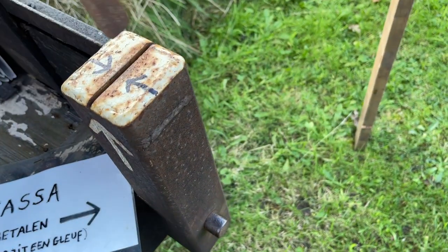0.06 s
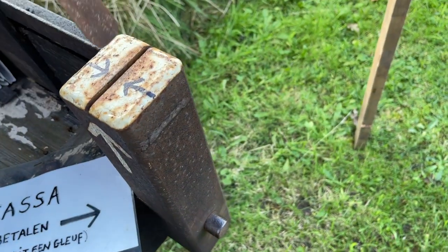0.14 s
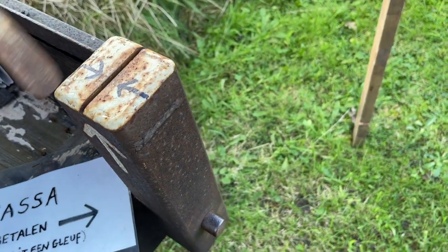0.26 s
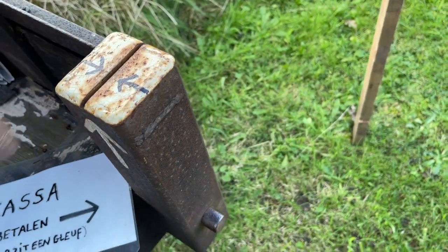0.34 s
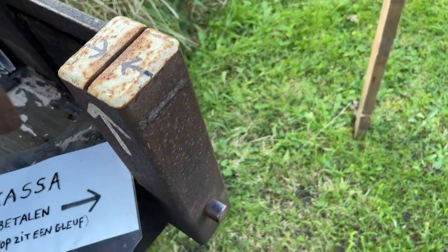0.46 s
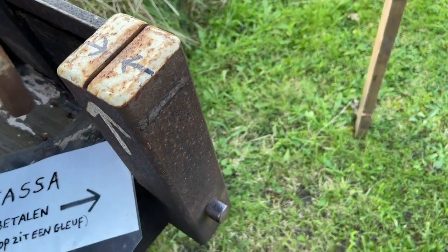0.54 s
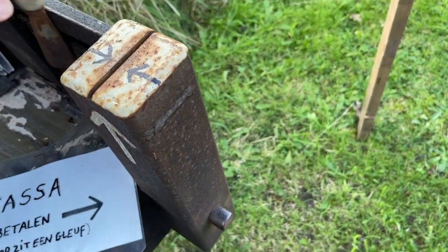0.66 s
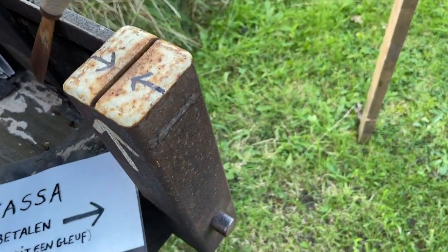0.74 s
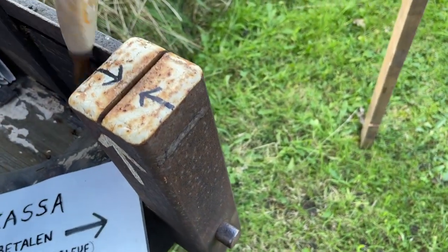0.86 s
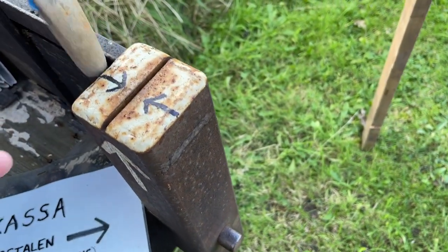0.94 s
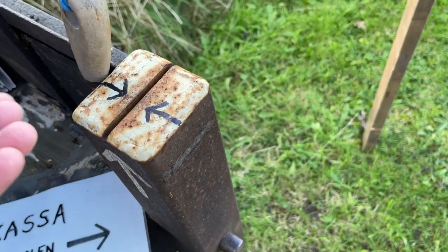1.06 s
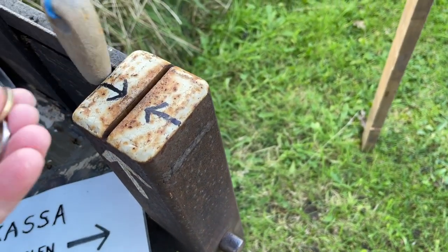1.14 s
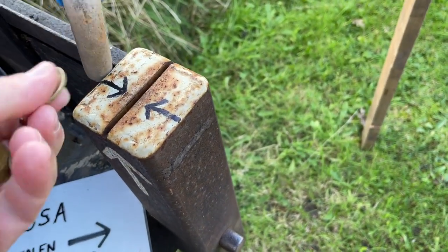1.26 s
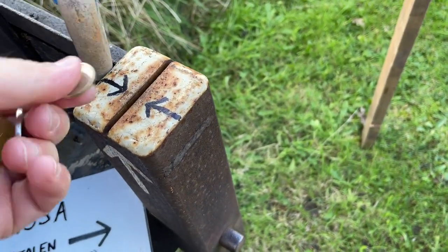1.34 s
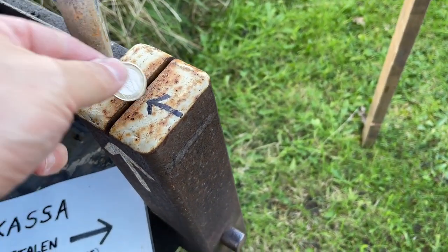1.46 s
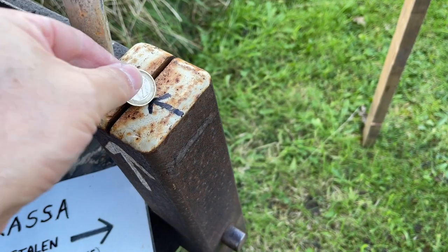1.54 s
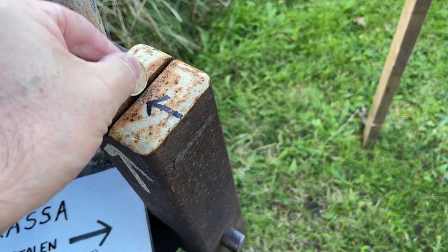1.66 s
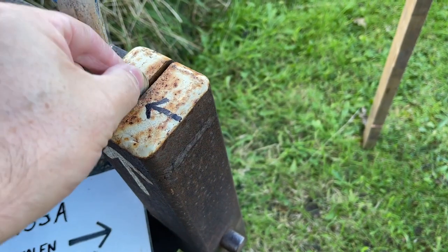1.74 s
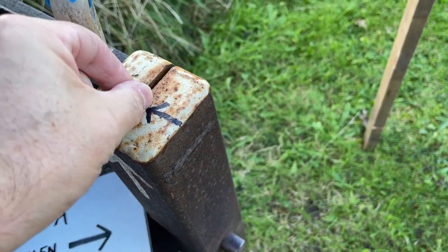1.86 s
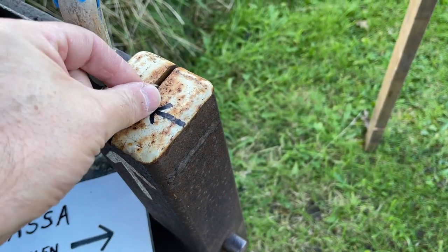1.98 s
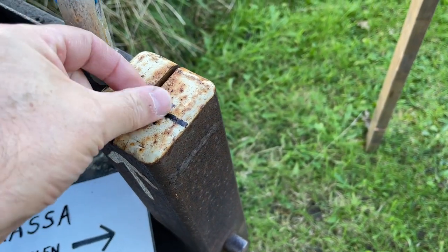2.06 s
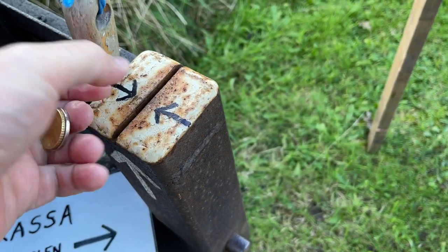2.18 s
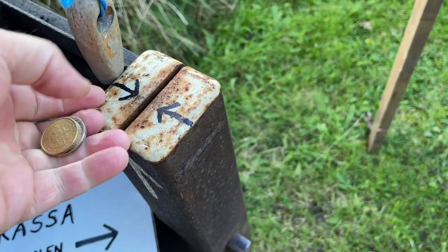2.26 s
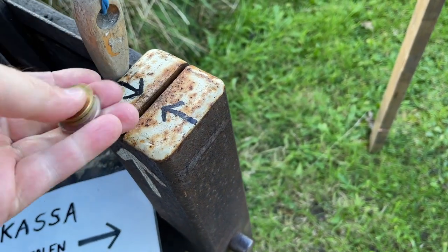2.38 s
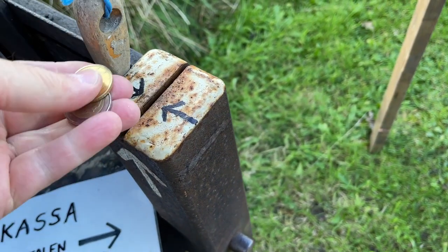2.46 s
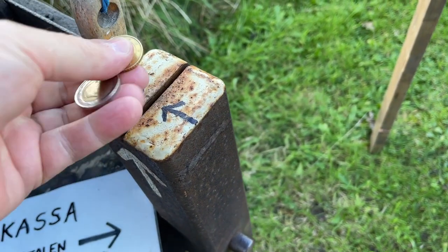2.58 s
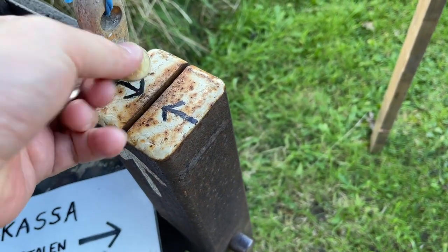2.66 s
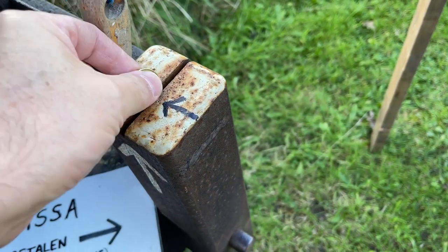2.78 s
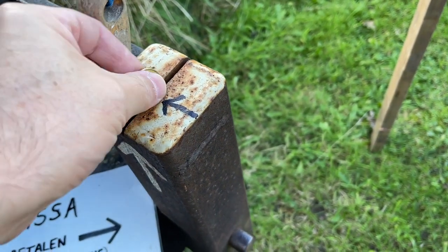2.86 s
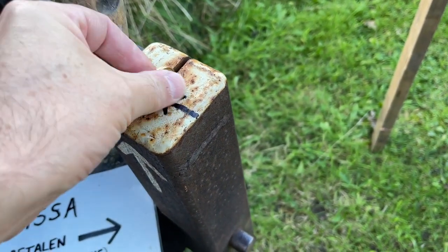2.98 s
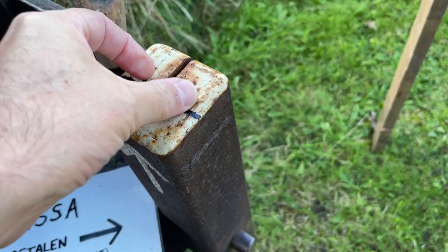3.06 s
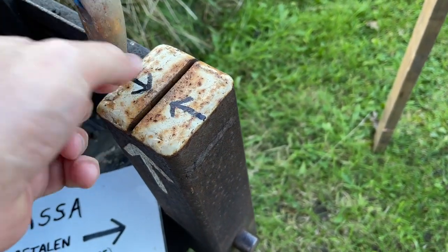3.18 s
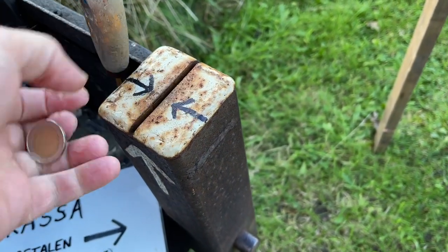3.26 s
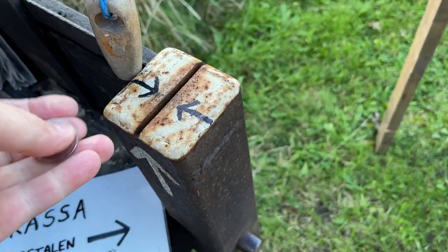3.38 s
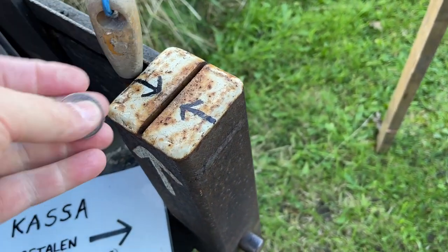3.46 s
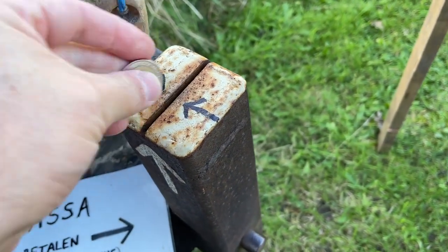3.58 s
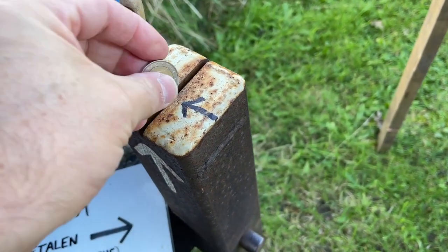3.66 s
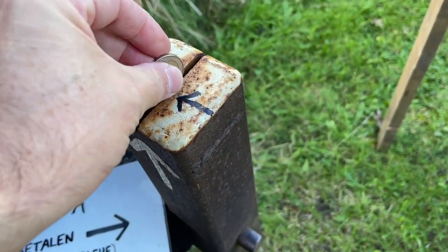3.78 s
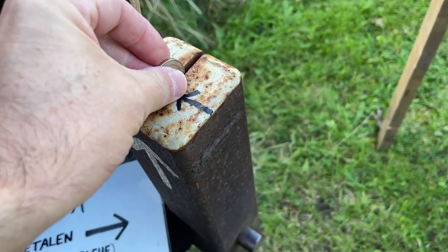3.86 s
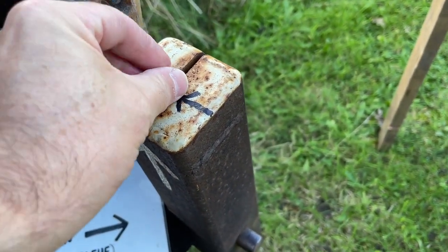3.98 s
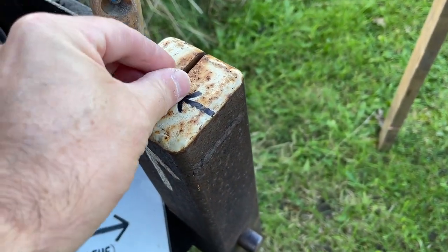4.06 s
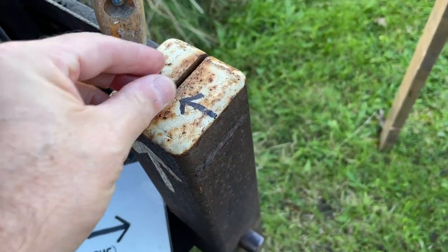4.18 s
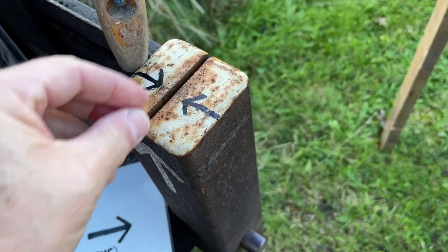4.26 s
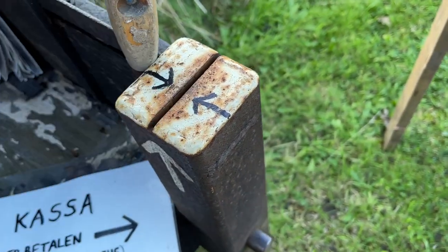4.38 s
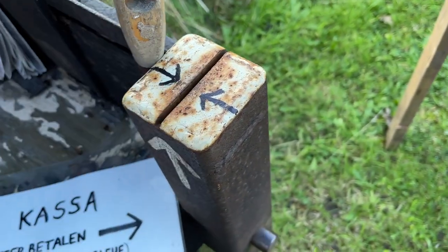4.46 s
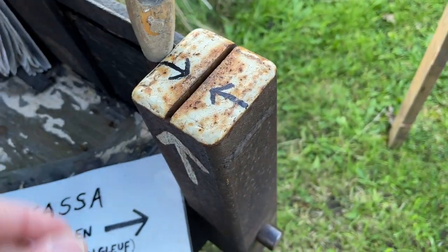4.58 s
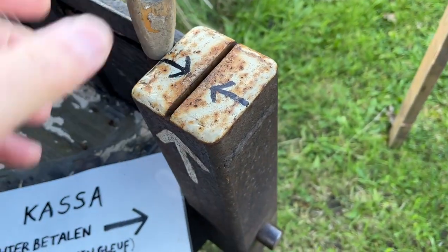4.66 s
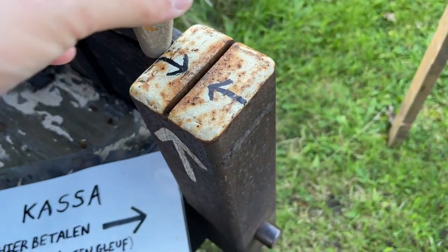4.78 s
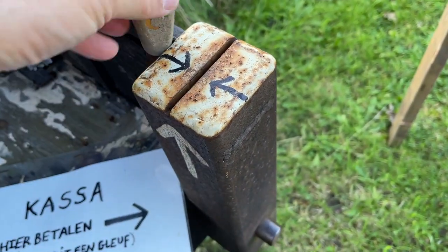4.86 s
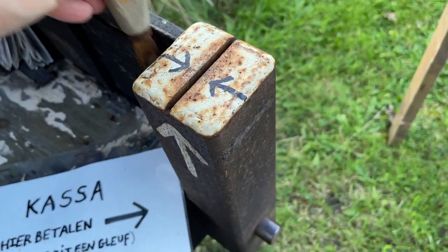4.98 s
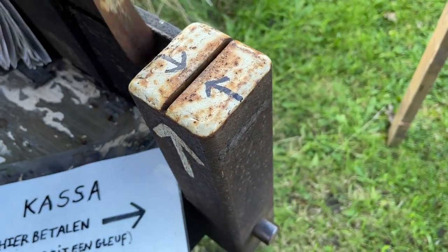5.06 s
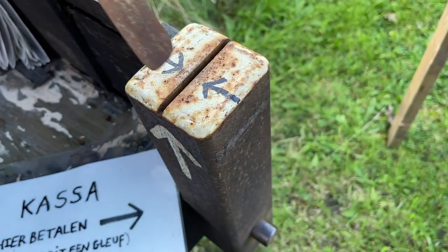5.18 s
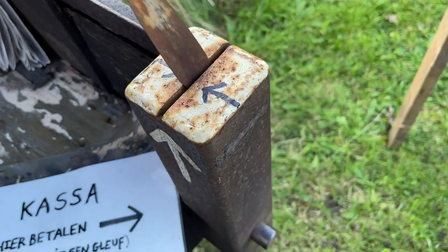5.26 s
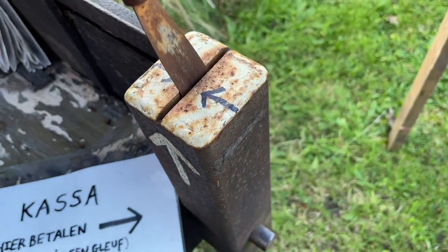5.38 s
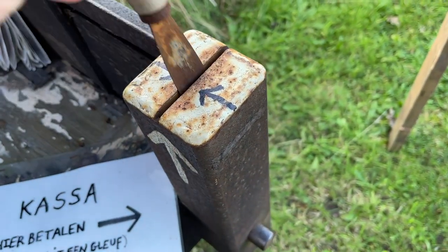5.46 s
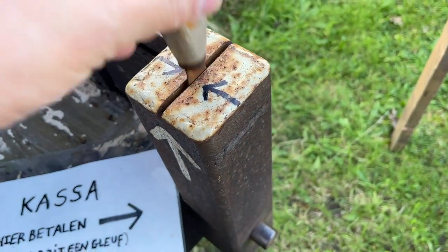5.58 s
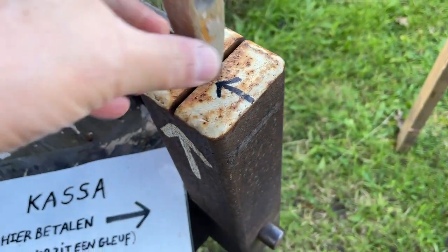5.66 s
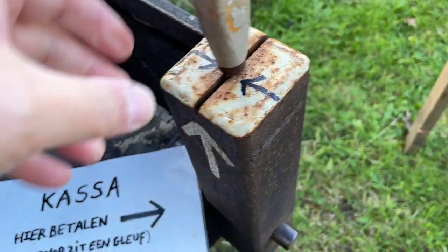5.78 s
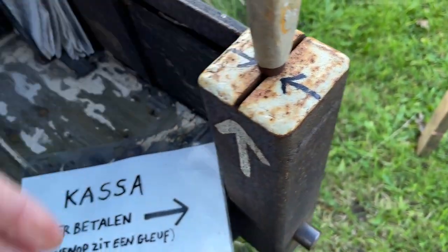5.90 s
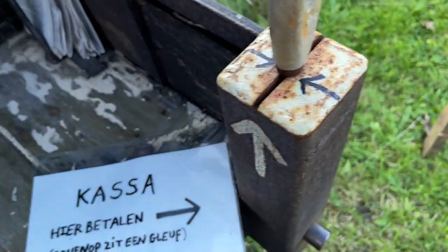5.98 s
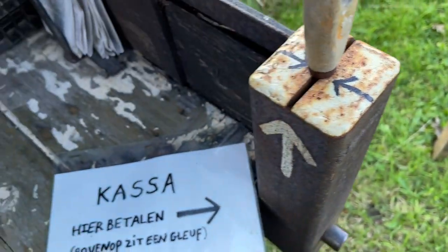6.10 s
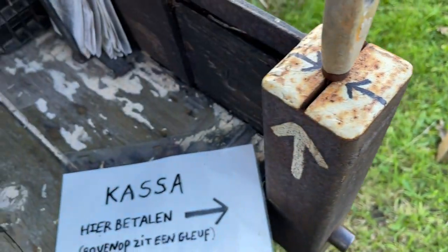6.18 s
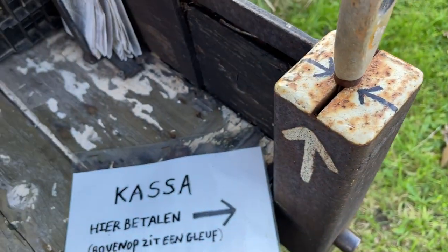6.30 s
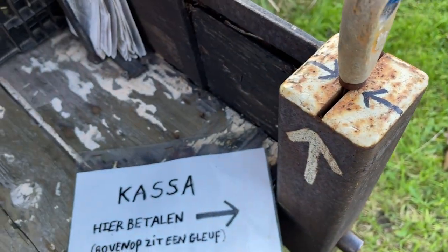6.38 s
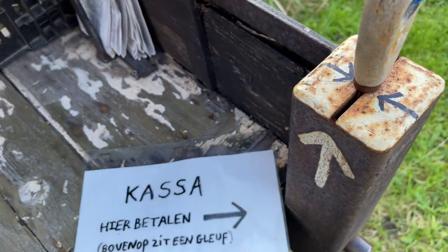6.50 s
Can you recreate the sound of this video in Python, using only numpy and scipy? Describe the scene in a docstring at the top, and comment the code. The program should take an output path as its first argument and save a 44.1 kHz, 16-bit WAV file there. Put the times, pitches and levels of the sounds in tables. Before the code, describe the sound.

Outdoors and close up, gusts of wind rumble and flutter on the microphone over a faint wash of distant traffic and rustling sleeve and grass. From about 0.7 to 1 second, a steel putty knife knocks and scrapes as it leaves the slot of a metal post. Coins then click and slide brightly in a hand. They scrape through the slot and clatter into the steel box at about 2.2 to 2.5 seconds, 3.1 to 3.4 and 4.2 to 4.6, with short metallic rings, some thin high ringing and more clicking between drops. At 4.9 seconds the blade knocks sharply on the post, then taps and scrapes. At 5.6 it drops into the slot and bounces faster and softer, ringing briefly and settling by about 6 seconds. One small click follows near 6.4. The wind eases around 4.3 seconds and returns at about 5.

```python
"""Coins into a steel pay post

A putty-knife blade is pulled from the slot of a post in a windy field. Coins click in a hand, scrape
through the slot and land inside; the blade drops back and bounces. Each contact is a noise crack plus
ringing steel modes; sliding is a run of tiny slips. Wind buffets the two microphone ports of a phone
close by, over far traffic and the rustle of sleeve and grass."""
import sys
import numpy as np
from scipy import signal
from scipy.fft import rfft, irfft, next_fast_len
from scipy.io import wavfile
from scipy.ndimage import map_coordinates

SR = 44100
rng = np.random.default_rng(int(sys.argv[2]) if len(sys.argv) > 2 else 0)


def unload_wav(signal):
    """Save mono or channel-first audio to the path in sys.argv[1] as 16-bit WAV at rate SR, clipped to [-1, 1]."""
    wavfile.write(
        sys.argv[1],
        SR,
        np.round(np.clip(np.atleast_2d(signal).T, -1, 1) * 32767).astype(np.int16),
    )


N = 288084

# held blade on the post: t/s, level/dB, favoured f/Hz, ring/dB, knock/dB, crack t60/s
BLADE_KNOCKS = [(0.6614, -8, 5110, -11.5, 0, 0.028), (0.6978, -26.5, 2550, 0.5, 13, 0.012),
                (0.718, -13, 2500, -7.5, 3.5, 0.023), (0.7534, -24.5, 2510, -12, 18, 0.14),
                (0.7804, -13.5, 10900, -8, 19, 0.03), (0.9013, -15, 10900, -20, -41, 0.033),
                (0.9337, -6, 4370, -11.5, -10.5, 0.031), (4.8908, 1, 8360, -9, -16.5, 0.023),
                (4.9453, -15.5, 11200, -15, -4, 0.031), (5.0196, -22, 2274, 2, -7, 0.036),
                (5.0493, -11, 2460, -14.5, -7, 0.02), (5.271, -4, 7230, -23, -14, 0.016),
                (5.305, -22, 2250, -12.5, -16, 0.038), (5.5136, -8, 8640, -13, -9, 0.039)]
# dropped blade, per landing: level/dB
LANDING_LEVELS_DB = [1, -2, -13.5, -14.5, -21.5, -28, -25, -39, -46, -52.5, -54]
# coins in the fingers: t/s, level/dB, favoured f/Hz, ring/dB
COIN_CLICKS = [(0.017, -28.5, 4200, -9), (0.037, -23, 10900, -28), (0.231, -25.5, 4700, -29),
               (0.267, -29, 6540, -19), (0.285, -35, 8500, -15), (0.54, -36.5, 9150, -16),
               (0.866, -36, 8500, -32), (0.909, -23, 7500, -6), (0.9594, -27, 4460, -11),
               (0.987, -7.5, 9250, -20), (1.002, -16.5, 11500, 0.5), (1.046, -20.5, 9400, -18),
               (1.059, -27, 8350, -6), (1.088, -9, 8800, -4), (1.1, -10, 8500, 3), (1.1078, -9.5, 9000, -1),
               (1.115, -28, 9000, -5), (1.19, -24, 5670, -19), (1.278, -12.5, 10700, -3.5),
               (1.3805, -9.5, 8700, -0.5), (1.3994, -12, 6760, -3.5), (1.516, -16.5, 7460, -31),
               (1.629, -14.5, 8340, -26), (1.692, -29, 7500, -28), (2.0367, -33.5, 6040, -6),
               (2.489, -4, 9000, -1), (2.554, -18, 8400, -10), (2.615, -16, 10500, 2),
               (2.6648, -10.5, 11300, -20), (2.706, -23, 5230, -27), (2.74, -15, 9150, -32),
               (2.781, -12.5, 7500, -25), (2.791, -5.5, 7700, -54), (2.802, -15, 9600, -15),
               (2.85, -16.5, 12000, -32), (2.989, -25, 9400, -21), (3.01, -10, 14200, -18),
               (3.088, -13, 14600, -23), (3.274, -13, 11400, -10), (3.441, -13, 8450, -1),
               (3.451, -13.5, 11700, 8), (3.5165, -12, 10700, 0), (3.587, -7.5, 13200, -28),
               (3.802, -21, 5160, -16), (3.823, -27, 4820, -19), (3.981, -27.5, 7750, -6),
               (4.519, -27, 11400, -22), (4.677, -29.5, 10200, 13), (5.133, -22.5, 6860, -6),
               (5.227, -26, 4160, -3.5), (5.412, -30.5, 7100, -1), (6.35, -12, 11600, -7.5)]
# one coin edge snapping past another: t/s, level/dB
COIN_TICKS = [(1.2735, -1), (1.468, -16), (1.513, -1), (1.578, -23), (1.5985, -12.5), (1.6246, 1.5),
              (1.6883, -8), (1.7108, -14), (2.5273, -5), (3.2707, -4)]
# coins on slot and box: t/s, level/dB, favoured f/Hz, knock/dB, crack t60/s
BOX_HITS = [(2.2257, -25, 2230, 14, 0.04), (2.2451, -2.5, 7760, -8, 0.02), (2.253, -6, 6800, -7, 0.036),
            (2.269, -3.5, 6300, -14, 0.028), (2.31, -15.5, 6370, -7, 0.037), (2.352, -15.5, 6000, -19, .04),
            (2.362, -7, 6300, -21, 0.02), (2.39, -29, 5000, -15, 0.024), (2.411, -25, 5260, -12, 0.035),
            (2.459, -24.5, 7260, -4.5, 0.12), (3.0264, -16, 5460, -16, 0.031),
            (3.151, -12, 6070, -19, 0.032), (3.1718, -2, 7700, -15, 0.049),
            (3.209, -1.5, 8900, -15.5, 0.028), (3.2185, -9.5, 9800, -16, 0.057),
            (3.3463, -9.5, 12060, -9.5, 0.028), (3.37, -4.5, 8450, -32, 0.047),
            (4.225, -37, 2100, -8, 0.025), (4.2427, -16.5, 8200, -0.5, 0.082),
            (4.261, -15.5, 1070, 9, 0.036), (4.273, -10.5, 7280, 2, 0.037), (4.359, -6, 7470, -14.5, 0.04),
            (4.3912, -17, 6250, -4, 0.037), (4.409, -30.5, 2670, 2.5, 0.063),
            (4.4496, -30.5, 6400, 6.5, 0.076), (4.505, -36, 2650, 7, 0.056), (4.5637, -22, 6270, -9, 0.047),
            (4.6257, -19.5, 5880, 6.5, 0.038)]
# modes of blade, coin and box: f/Hz, relative level/dB, nominal t60/s
BLADE_RESONANCES = [(636, -6.5, 0.085), (765, -8.5, 0.18), (852, -15.5, 0.19), (1036, -9.5, 0.11),
                    (1251, -12.5, 0.13), (1650, -15, 0.11), (1975, -12.5, 0.26), (2284, -4.5, 0.075),
                    (2500, -16, 0.24), (2920, -18, 0.14), (3526, -11, 0.19), (4370, -14, 0.14),
                    (5365, -6.5, 0.1), (5550, -9.5, 0.14), (6910, 0, .05), (7660, -2.5, 0.062),
                    (7350, -8, 0.047), (8770, -4.5, 0.053), (11280, -4, 0.061)]
COIN_RESONANCES = [(6110, 9.9, 0.03), (7820, 9.3, 0.035), (8770, 15.4, 0.024), (10900, 3.6, 0.098),
                   (11104, 23.2, 0.027), (12800, 4.2, 0.045)]
BOX_RESONANCES = [(190, -10, 0.052), (577, 3, 0.049), (613, -3, 0.097), (749, -10, 0.11),
                  (1085, -6.5, 0.081), (1360, -14, 0.085), (1660, -17, 0.13), (2255, -13.5, 0.14),
                  (2673, -11, 0.064), (3411, -3, 0.06), (4400, -11, 0.046), (5430, -16, 0.11),
                  (5700, -1, 0.086), (6085, 3.5, 0.039), (6700, -7, 0.079), (7070, -0.5, 0.053),
                  (7486, -8, 0.1), (8550, -8.5, 0.13), (8770, -6, 0.11), (9150, -4.5, 0.074),
                  (11150, -6, 0.1), (12220, -3.5, 0.042), (12500, -20, 0.047)]
# long rings of blade and post: t/s, length/s, f/Hz, level/dB, fade/(dB/s)
LONG_RINGS = [(0.661, 0.029, 8661, -23, 300), (0.664, 0.085, 3481, -31.5, 200),
              (0.721, 0.043, 2521, -33, 100), (0.723, 0.039, 1271, -23, 100), (0.933, 0.12, 2495, -31, 133),
              (0.934, .16, 4361, -31, 149), (1.516, 0.038, 5610, -34, 250), (2.495, 0.052, 625, -33, 100),
              (3.185, 0.1, 596, -36.5, 47), (3.198, 0.053, 1648, -32.5, 60), (3.353, 0.067, 1651, -39, 40),
              (3.439, 0.16, 774, -42, 67), (4.246, 0.085, 590, -28, 123), (4.255, 0.075, 1668, -37, 120),
              (4.259, 0.06, 201, -29, 60), (4.36, 0.27, 1091, -52, 32), (4.362, 0.22, 585, -41, 53),
              (4.495, 0.13, 1659, -54, 13), (4.629, 0.12, 785, -39.5, 64), (4.637, 0.062, 1371, -45, 100),
              (5.534, 0.087, 5337, -43, 5), (5.596, 0.45, 3466, -38, 43), (5.605, 0.4, 1943, -35, 18),
              (5.684, 0.38, 2257, -50, 38), (5.69, .31, 768, -42, 25)]
# loose coin singing: t/s, length/s, index into COIN_EDGE_HZ, level/dB
COIN_SINGS = [(2.246, 0.027, 2, -7), (2.28, .17, 2, -14), (2.615, 0.064, 2, -17), (3.009, 0.17, 1, -23),
              (3.198, 0.3, 1, -20), (3.35, 0.21, 1, -7), (3.43, 0.2, 2, -21), (4.642, 0.14, 1, -23)]
# slides of blade, coins and fingers: t/s, length/s, hiss/dB, rasp/dB, rasp f/Hz
SLIDES = [(0.211, 0.13, -54, -52, 2980), (0.336, 0.096, -50.5, -55, 6500), (0.671, 0.07, -63, -36, 2200),
          (0.7, 0.052, -46, -31.5, 1260), (0.78, 0.024, -19.5, -35, 2190), (0.795, 0.04, -43, -38.5, 2400),
          (0.947, 0.053, -28, -65, 5500), (1.064, 0.09, -24.5, -41, 5930), (1.117, 0.11, -39, -34.5, 5630),
          (2.239, 0.074, -31.5, -39, 6000), (2.345, 0.093, -39, -40.5, 5230), (2.484, 0.06, -30, -34, 6700),
          (2.562, 0.13, -39, -50, 4550), (2.686, 0.1, -44.5, -42.5, 2310), (3.193, 0.042, -40, -27, 6040),
          (3.367, 0.031, -18.5, -30, 6040), (3.443, 0.18, -34, -51, 4200), (4.238, 0.05, -42, -44, 3830),
          (4.623, .13, -27.5, -69, 6000), (5.03, 0.018, -31, -39, 3500), (5.09, 0.086, -44.5, -42.5, 3180),
          (5.205, 0.05, -46, -46.5, 3900), (5.533, 0.081, -37.5, -48, 5600),
          (6.367, 0.039, -48, -42.5, 3180)]
# spectra of contact crack and sliding hiss: f/Hz, level/dB
CRACK_EQ = [(150, -22), (500, 7), (1500, 3.5), (3000, -2.5), (6000, -2), (9000, 1.5), (12000, -1),
            (14000, -8.5), (16500, 10)]
SLIDE_EQ = [(5000, -18.5), (7300, -4.5), (8600, 3.5), (10200, 9.5), (11700, 7), (13000, -9), (16000, -12)]
# gusts on the ports: t/s, hold/s, rumble/dB, flutter offset/dB
WIND_GUSTS = [(0.02, 0.062, -24, -3), (0.118, 0.034, -26.5, 4.5), (0.207, 0.014, -30, -6),
              (0.282, 0.008, -29, 1.5), (0.407, 0.032, -25.5, 3.5), (0.443, 0.098, -23, 2),
              (0.72, 0.02, -26.5, -4.5), (0.776, 0.13, -23, -2), (0.987, 0.011, -31, -9),
              (1.102, 0.013, -26.5, 4.5), (1.197, 0.01, -28, -8.5), (1.513, 0.14, -30, -4.5),
              (1.774, 0.29, -28.5, -2.5), (2.342, 0.013, -33.5, -3.5), (2.577, 0.15, -28, -1.5),
              (2.808, 0.091, -27.5, -14.5), (3.139, 0.033, -32, -9.5), (3.454, 0.013, -29.5, -9),
              (3.669, 0.022, -28, -7.5), (3.968, 0.0095, -26, -5), (4.709, 0.011, -29.5, 3.5),
              (4.935, 0.0066, -15.5, -1.5), (4.996, 0.027, -24, 4.5), (5.059, 0.25, -25.5, -1.7),
              (5.37, 0.064, -31, -8.5), (5.758, 0.0088, -30.5, -22), (5.996, 0.017, -18.5, -4),
              (6.068, 0.065, -30.5, -3.5), (6.19, 0.19, -32.5, -8.5), (6.391, 0.018, -18.5, 0.5),
              (6.498, 0.078, -19.5, -9.5)]
# rumble between gusts: t/s, level/dB
BREEZE_LEVELS = [(0, -37), (1.0, -39), (1.4, -45.5), (2.2, -44), (3.0, -41.5), (4.0, -40), (4.3, -57),
                 (4.6, -51), (5.0, -42.5), (6.53, -41)]
# eddies striking the ports: t/s, relative level/dB
EDDIES = [(0.444, -8.5), (0.516, -3.5), (0.78, -6), (0.863, -13), (1.095, -4.5), (1.136, -13.5),
          (1.503, -17.5), (1.568, -23), (1.589, -22.5), (1.9, -15), (2.587, -5), (2.708, -16), (3.96, -31),
          (4.912, -5.5), (4.938, -10), (5.102, -8), (5.223, -9.5), (6.005, -11), (6.407, -21)]
# turbulence spectra, low to high: f/Hz, level/dB
RUMBLE_EQ = [(15, -62), (30, -28), (45, 3), (70, 7.5), (120, 2), (200, -8.5), (400, -57)]
FLUTTER_EQ = [(80, -11), (150, 1.5), (250, 2), (350, -4.5), (600, -83)]
CRACKLE_EQ = [(200, -16.5), (380, 2), (600, -5.5), (900, -18), (1500, -28.5), (3000, -52.5)]
# spectrum of far traffic and grass: f/Hz, level/dB
FIELD_EQ = [(100, -13), (300, -13.5), (727, -18), (1440, -22), (1900, -27), (2620, -27), (4270, -44.5),
            (8830, -44.5), (10300, -38), (11700, -43), (12300, -79), (12800, -94)]
# left-right likeness of the background: f/Hz, coherence
FIELD_COHERENCE = [(300, 0.48), (2000, 0.078), (6000, 0.45), (10000, 1)]
# sleeve and grass, relative levels: t/s, low band/dB, high band/dB
RUSTLE_LEVELS = [(0, -69, -53), (.1, -70, -62), (.3, -52, -61), (.6, -59, -58.5), (1.8, -54.5, -53),
                 (2.3, -49.5, -56), (3.5, -47, -44.5), (4.1, -62, -56), (5.3, -50.5, -48.5),
                 (6.53, -53, -51.5)]
# rustle spectra: f/Hz, level/dB
LOW_RUSTLE_EQ = [(600, -8), (1200, 0), (2600, -0.5), (4000, -20)]
HIGH_RUSTLE_EQ = [(2000, -10), (3500, 3), (8500, 1), (10300, 1), (11700, 2.5), (12300, -42), (12800, -60)]
# phase between the ports: f/Hz, left lead/rad
PORT_PHASE = [(0, 0), (500, .4), (1100, 1.1), (2000, 1.7), (2800, .9), (4200, .4), (5800, .6), (7300, 1),
              (8700, -.4), (10250, -3.2), (11700, -5.4), (12500, -6.8), (13100, -8.6), (14300, -9.8),
              (15500, -10)]
# treble cut above 12 kHz that dulls the whole sound: f/Hz, gain/dB
TREBLE_CUT_EQ = [(12300, 2), (13500, -10), (16000, -24)]

COIN_EDGE_HZ = (11100, 13120, 14210)
SIDES = np.array([[1], [-1]])  # left, right


def amp(db):
    """dB to gain."""
    return 10 ** (np.asarray(db) / 20)


def along(points, hz):
    """Interpolate (f/Hz, value) points on a log axis."""
    f, v = np.transpose(points)
    return np.interp(np.log(hz + 1), np.log(f + 1), v)


def curves(rows):
    """Per-sample curve of each column after t/s."""
    times, *columns = np.transpose(rows)
    return [np.interp(np.arange(N) / SR, times, column) for column in columns]


def wobble(rate_hz):
    """Smooth random curve, rate_hz knots a second."""
    knots = rng.standard_normal(int(N * rate_hz / SR) + 4)
    return map_coordinates(knots, [np.arange(N) * rate_hz / SR])


def filtered(x, response):
    """Apply a complex frequency response."""
    m = next_fast_len(x.shape[-1] + 2048)
    return irfft(rfft(x, m) * response(np.fft.rfftfreq(m, 1 / SR)), m)[..., :x.shape[-1]]


def stereo(noises, eq, coherence):
    """Two noises to stereo, rms 1. eq/dB: table or function; coherence: table or number."""
    def response(f):
        alike = np.full_like(f, coherence) if np.isscalar(coherence) else along(coherence, f)
        angle = np.arccos(np.clip(alike, -1, 1)) / 2
        return amp(eq(f) if callable(eq) else along(eq, f)) * [np.cos(angle), np.sin(angle)]
    mid, side = filtered(noises, response)
    both = np.array([mid + side, mid - side])
    return both / np.sqrt(np.mean(both ** 2) + 1e-20)


def strike(hits, modes, sustain, favour_db, width_oct, scatter_db, detune, coherence, knock_hz, snap,
           clatter_db):
    """Each hit cracks and rings the modes, most near the pitch its spot favours. Rows as BLADE_KNOCKS."""
    out, t = np.zeros((2, N + SR)), np.arange(SR // 3) / SR
    n = SR // 8
    crack_t = t[:n]
    mode_hz, mode_db, t60_s = np.transpose(modes)[:, :, None]
    for start_s, db, spot_hz, ring_db, knock_db, crack_s in hits:
        def spot_db(f):
            favoured = favour_db * np.exp(-(np.log2((f + 1) / spot_hz) / width_oct) ** 2)
            return favoured + knock_db / (1 + (f / knock_hz) ** 6)
        scatter, mistune, split, skew = rng.standard_normal((4, len(modes), 1))
        gain = amp(mode_db + spot_db(mode_hz) + scatter_db * scatter)
        hz = mode_hz * (1 + detune * mistune)
        beat = 1 + 0.71 * np.cos(2 * np.pi * (0.009 * hz * split * t + mistune))  # rust splits the modes
        decay = amp(-60 * t / (t60_s * sustain * crack_s / 0.032))  # a firm grip shortens crack and ring
        envelope = gain * beat * decay
        phase = 2 * np.pi * hz * t
        ring = np.array([np.sum(envelope * np.sin(phase + 0.41 * k * skew), axis=0) for k in (1, -1)])
        ring *= amp(ring_db) / np.linalg.norm(gain) * (1 - np.exp(-t / 0.00015))
        hiss = stereo(rng.standard_normal((2, n)), lambda f: along(CRACK_EQ, f) + spot_db(f), coherence)
        blows = rng.standard_normal(n) ** 3 * amp(-60 * crack_t / (1.56 * crack_s))  # many tiny blows
        blows[0] = 1.17 * np.linalg.norm(blows)  # the first is hardest
        hit = signal.fftconvolve(ring, blows[None] / np.linalg.norm(blows), axes=1)[:, :len(t)]
        clatter = amp(clatter_db - 60 * crack_t / (4.54 * crack_s))  # countless weak modes die later
        crack = amp(-60 * crack_t / crack_s) + clatter + snap * np.exp(-crack_t / 0.00043)
        hit[:, :n] += 0.5 * hiss * crack * (1 - np.exp(-crack_t / 0.00065))
        out[:, round(start_s * SR):][:, :len(t)] += amp(db) * hit
    return out[:, :N]


def held_blade():
    """The gripped blade knocks on the post."""
    return strike(BLADE_KNOCKS, BLADE_RESONANCES, sustain=0.89, favour_db=16.5, width_oct=0.071,
                  scatter_db=2.5, detune=0.0024, coherence=0.48, knock_hz=2000, snap=0.42, clatter_db=-24)


def dropped_blade(drop_s=5.5977, flight_s=0.0835, shrink=0.795, rock_s=0.038, crack_s=0.021):
    """The blade bounces ever faster on the slot, rocking once after each of the first three landings."""
    land_hz, rock_hz = 2200, (5340, 6850, 6850)
    land_s = drop_s + flight_s * (1 - shrink ** np.arange(len(LANDING_LEVELS_DB))) / (1 - shrink)
    # weak landings: more ring and knock than crack
    landings = [(land_s[i], db, land_hz, -14.5 + 2.71 * i, 4 * i, crack_s)
                for i, db in enumerate(LANDING_LEVELS_DB)]
    rocks = [(land_s[i] + rock_s, -21 - 8 * i, hz, 3.5, -9, crack_s) for i, hz in enumerate(rock_hz)]
    return strike(landings + rocks, BLADE_RESONANCES, sustain=1.2, favour_db=9.5, width_oct=0.045,
                  scatter_db=2, detune=0.0023, coherence=0.91, knock_hz=3050, snap=1.6, clatter_db=-16)


def coins_in_hand(knock_db=-6, tick_hz=7600, tick_ring_db=-21, tick_s=0.0071):
    """Coins click and tick, too small to knock; freely ringing clicks last longer."""
    clicks = [(start_s, db, hz, ring_db, knock_db, 0.037 * np.exp(0.014 * ring_db))
              for start_s, db, hz, ring_db in COIN_CLICKS]
    ticks = [(start_s, db, tick_hz, tick_ring_db, knock_db, tick_s) for start_s, db in COIN_TICKS]
    return strike(clicks + ticks, COIN_RESONANCES, sustain=0.76, favour_db=10.5, width_oct=0.73,
                  scatter_db=4.5, detune=0.029, coherence=0.82, knock_hz=2340, snap=0.51, clatter_db=-24)


def coins_in_box(ring_db=-6.5):
    """Coins hit the slot and land inside, ringing the steel box."""
    hits = [(start_s, db, hz, ring_db, *rest) for start_s, db, hz, *rest in BOX_HITS]
    return strike(hits, BOX_RESONANCES, sustain=0.88, favour_db=13.5, width_oct=0.047,
                  scatter_db=4, detune=0.0042, coherence=0.63, knock_hz=2340, snap=0.39, clatter_db=-15)


def lingering_modes(waver_db=3.5, waver_hz=22):
    """Single modes of blade and post ring on, fed by a rolling coin or dragging edge."""
    out = np.zeros((2, N))
    for start_s, length_s, hz, db, fade_db_per_s in LONG_RINGS:
        t = np.arange(int(length_s * SR)) / SR
        gate = np.clip(np.minimum(t / 0.0024, (t[-1] - t) / 0.039), 0, 1)
        knots = rng.standard_normal((3, 40))
        depth = min(1, 1000 / hz) ** 0.49  # steadier above 1 kHz
        swell, drift = (depth * map_coordinates(k, [t * 70]) for k in knots[:2])
        phase = 2 * np.pi * np.cumsum(hz + waver_hz * drift) / SR + 0.15 * knots[2, 0] * SIDES
        envelope = amp(db - fade_db_per_s * t + waver_db * swell) * gate
        out[:, round(start_s * SR):][:, :len(t)] += envelope * np.sin(phase)
    return out


def singing_coins(waver_hz=60, fade_db_per_s=116):
    """A loose coin sings on an edge mode until caught, wavering as it turns."""
    out = np.zeros((2, N))
    waver_rad = 2 * np.pi * waver_hz * np.cumsum(wobble(280)) / SR
    for start_s, length_s, mode, db in COIN_SINGS:
        t = np.arange(int(length_s * SR)) / SR
        gate = np.clip(np.minimum(t / 0.0027, (t[-1] - t) / 0.014), 0, 1)
        span = slice(round(start_s * SR), round(start_s * SR) + len(t))
        tone = np.sin(2 * np.pi * COIN_EDGE_HZ[mode] * t + waver_rad[span])
        out[:, span] += amp(db - fade_db_per_s * t) * gate * tone
    return out * amp(4.4 * wobble(70) + 1.7 * np.array([wobble(78), wobble(70)]))


def sliding():
    """Tiny uneven slips: a high hiss and a rasp around one pitch."""
    out = np.zeros((2, N))
    grit = amp(4 * wobble(450) + 2.2 * wobble(80))
    for start_s, length_s, hiss_db, rasp_db, rasp_hz in SLIDES:
        n = int(length_s * SR)
        span = slice(round(start_s * SR), round(start_s * SR) + n)
        slips = grit[span] * rng.standard_normal((4, SR // 4))[:, :n]
        hiss = stereo(slips[:2], SLIDE_EQ, 0.97)
        rasp = stereo(slips[2:], lambda f: -23 * np.abs(np.log2((f + 1) / rasp_hz)), 0.55)
        arch = np.sin(np.linspace(0, np.pi, n)) ** 0.5
        out[:, span] += arch * (amp(hiss_db) * hiss + amp(rasp_db) * rasp)
    return out


def gust_levels(rise_db_per_s=363, fall_db_per_s=252):
    """Rumble and flutter in dB: gusts rise, hold and fall back to the breeze; flutter moves faster."""
    start_s, hold_s, db, offset_db = np.transpose(WIND_GUSTS)[:, :, None]
    t = np.arange(N) / SR
    breeze_db, = curves(BREEZE_LEVELS)
    drop_db = rise_db_per_s * np.maximum(start_s - t, 0)
    drop_db += fall_db_per_s * np.maximum(t - start_s - hold_s, 0)
    rumble_db = np.maximum(breeze_db, np.max(db - drop_db, axis=0))
    flutter_db = np.maximum(breeze_db - 10.5, np.max(db + offset_db - 1.69 * drop_db, axis=0))
    return rumble_db, flutter_db - 1


def eddy_pops(typical_hz=490, rise_cycles=0.65):
    """An eddy strikes the ports: a short pop, falling in pitch."""
    out, t = np.zeros((2, N + SR)), np.arange(SR // 20) / SR
    for start_s, db in EDDIES:
        offset, skew, spread = rng.standard_normal(3)
        hz = typical_hz * np.exp(0.15 * spread)
        age = hz * t / rise_cycles
        swing = np.sin(2 * np.pi * (hz * t / (1 + 18 * t) + offset) + 0.37 * skew * SIDES)
        out[:, round(start_s * SR):][:, :len(t)] += amp(db - 3) * (age * np.exp(1 - age)) ** 2 * swing
    return out[:, :N]


def wind():
    """Lumpy turbulence on the ports, louder on the left; strong lumps are brighter."""
    rumble_db, flutter_db = gust_levels()
    surge = wobble(40)
    rumble_lumps = amp(3 * wobble(25))
    flutter_lumps = amp(4 * surge + 2 * wobble(70))
    crackle_lumps = amp(5 * surge + 4.5 * wobble(110))
    rumble = stereo(rumble_lumps * rng.standard_normal((2, N)), RUMBLE_EQ, 0.83)
    flutter = stereo(flutter_lumps * rng.standard_normal((2, N)), FLUTTER_EQ, 0.77)
    crackle = stereo(crackle_lumps * rng.standard_normal((2, N)), CRACKLE_EQ, 0.67)
    buffeting = amp(rumble_db) * rumble + amp(flutter_db) * (flutter + amp(-4.5) * crackle)
    return (buffeting + eddy_pops()) * amp(1.1 * SIDES)


def field():
    """Steady wash of far traffic and grass."""
    return amp(-48.5) * stereo(rng.standard_normal((2, N)), FIELD_EQ, FIELD_COHERENCE)


def rustle():
    """Sleeve and grass: faint gritty noise that comes and goes."""
    out = np.zeros((2, N))
    for db, eq in zip(curves(RUSTLE_LEVELS), (LOW_RUSTLE_EQ, HIGH_RUSTLE_EQ)):
        grit = amp(2.5 * wobble(30) + 2.9 * wobble(200)) * rng.standard_normal((2, N))
        out += amp(db - 1.5) * stereo(grit, eq, FIELD_COHERENCE)
    return out


def scene():
    """All sources at the phone."""
    impacts = held_blade() + dropped_blade() + coins_in_hand() + coins_in_box()
    return impacts + lingering_modes() + singing_coins() + sliding() + wind() + field() + rustle()


def record(dry):
    """Left-right phase shift, treble cut above 12 kHz, soft clip, band limit."""
    top_hz = 16500
    hz, lead_rad = np.transpose(PORT_PHASE)
    dulled = filtered(
        dry, lambda f: amp(along(TREBLE_CUT_EQ, f)) * np.exp(0.5j * SIDES * np.interp(f, hz, lead_rad)))
    clipped = dulled / (1 + np.abs(dulled) ** 6) ** (1 / 6)
    return filtered(clipped, lambda f: f < top_hz)


dry = scene()
out = record(dry)
unload_wav(out)
```